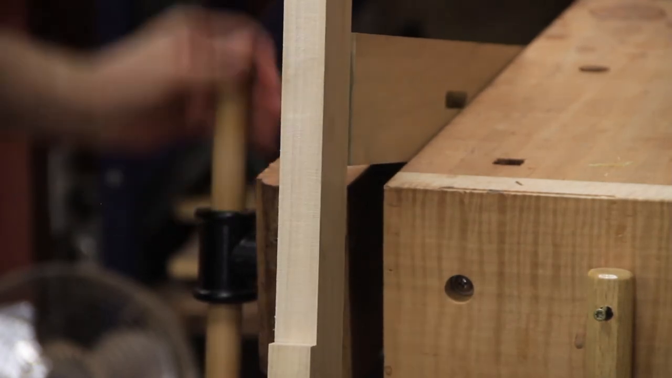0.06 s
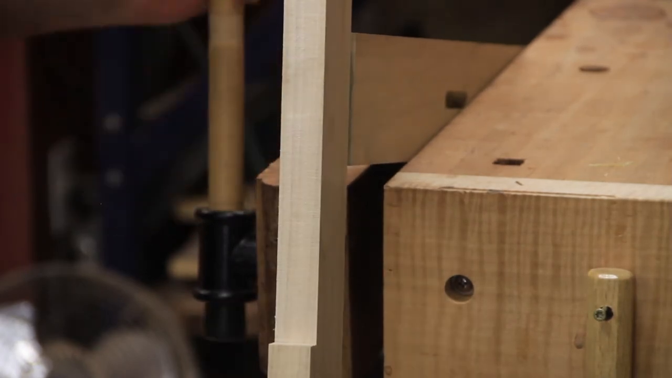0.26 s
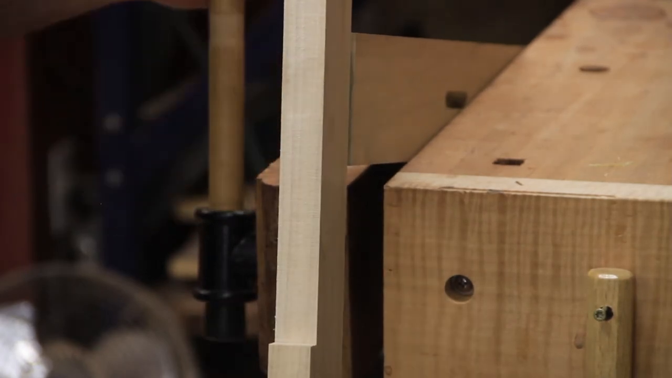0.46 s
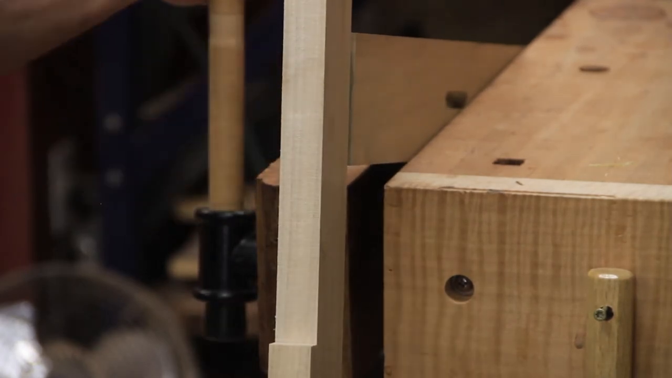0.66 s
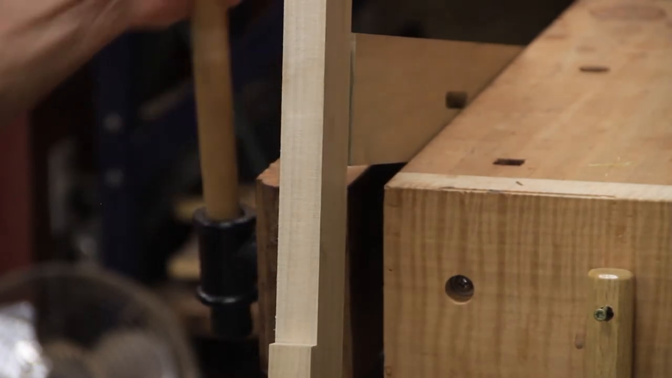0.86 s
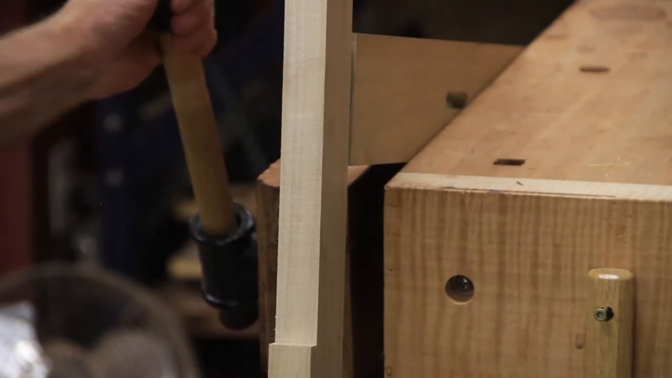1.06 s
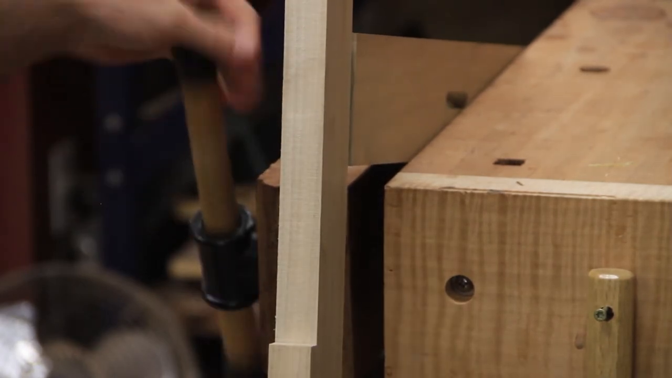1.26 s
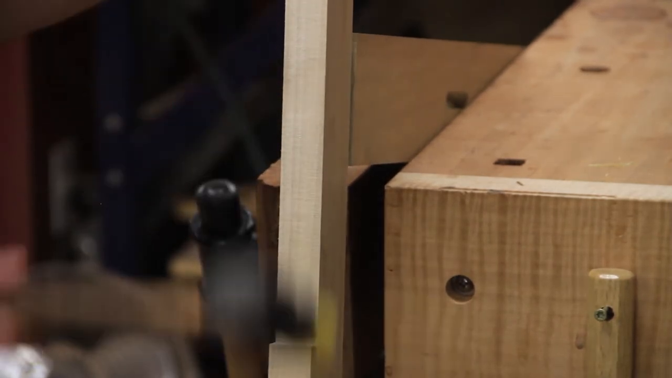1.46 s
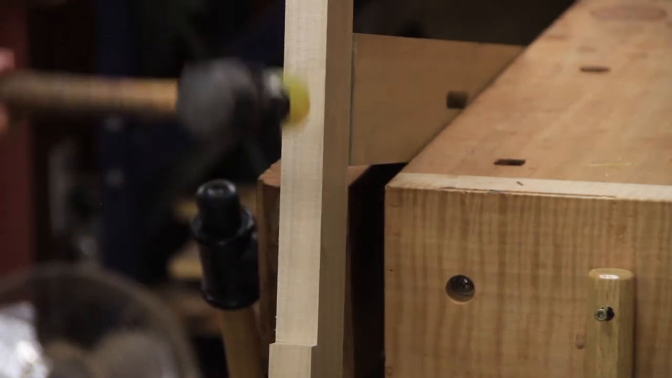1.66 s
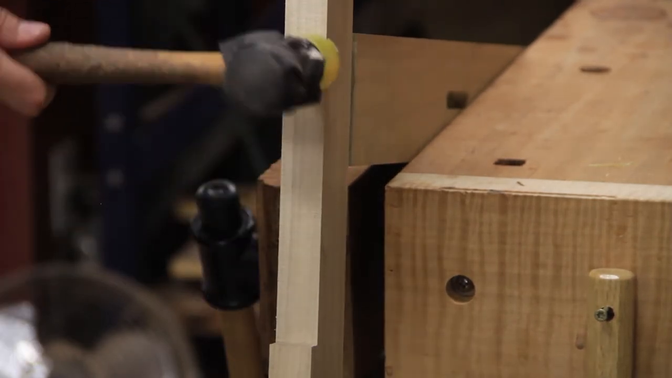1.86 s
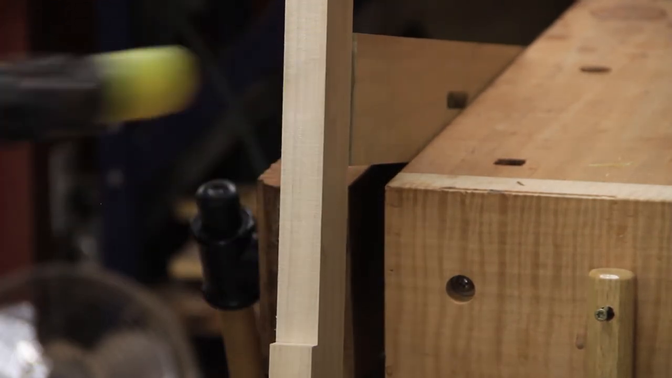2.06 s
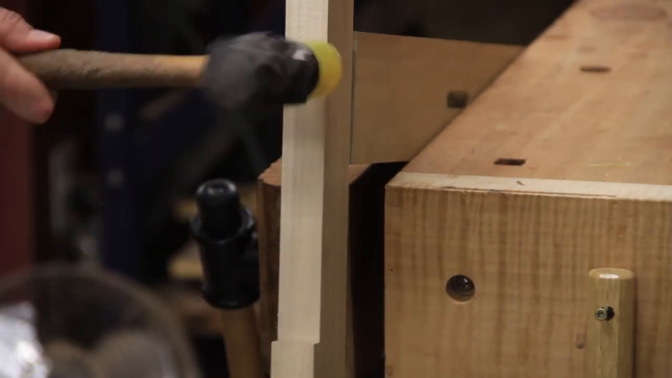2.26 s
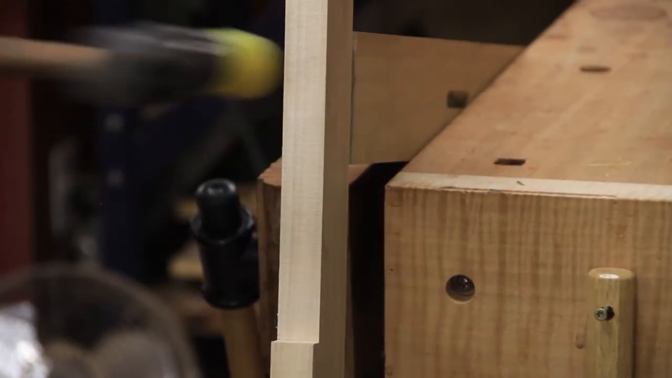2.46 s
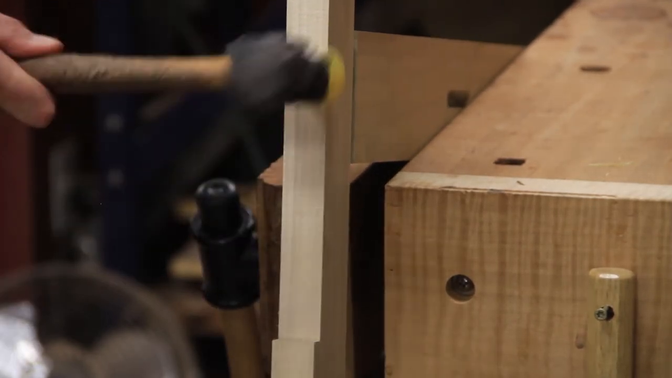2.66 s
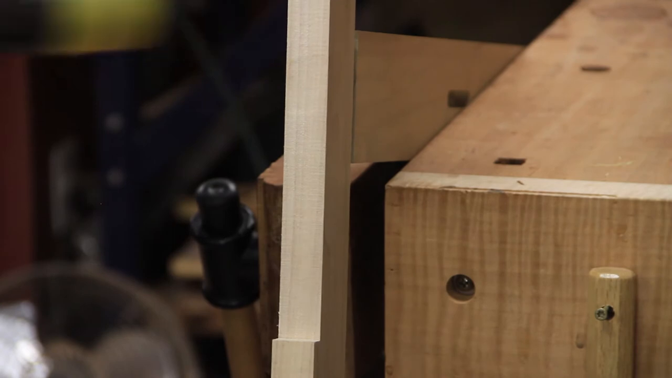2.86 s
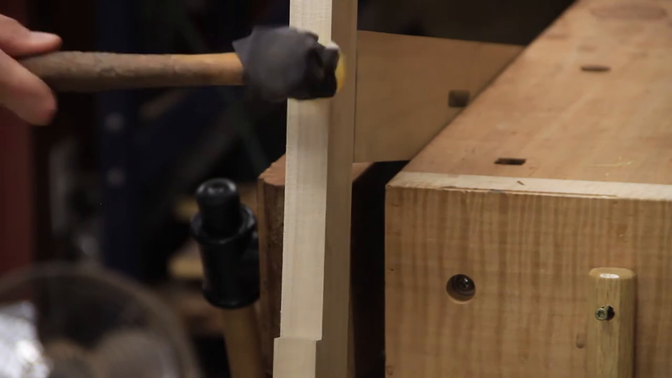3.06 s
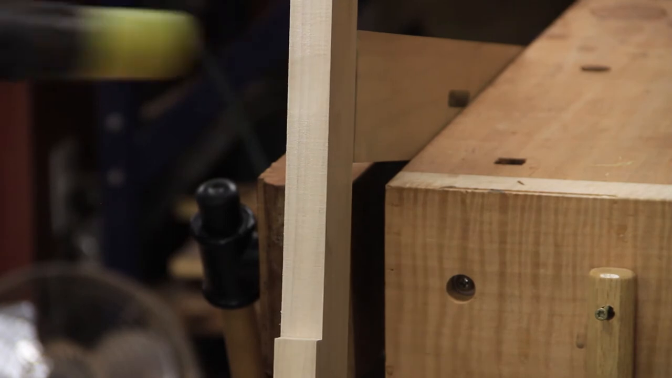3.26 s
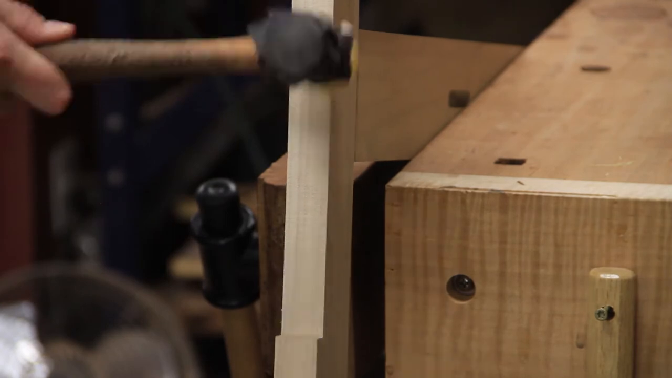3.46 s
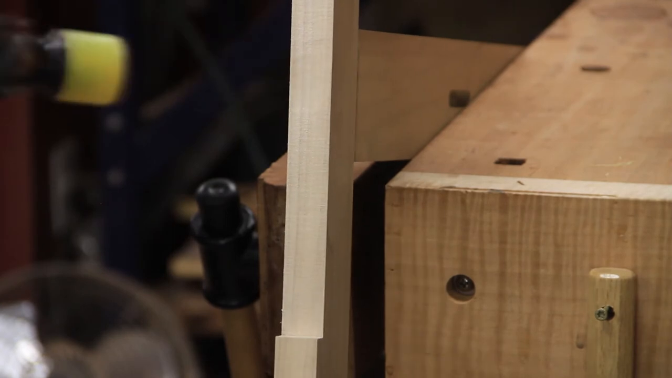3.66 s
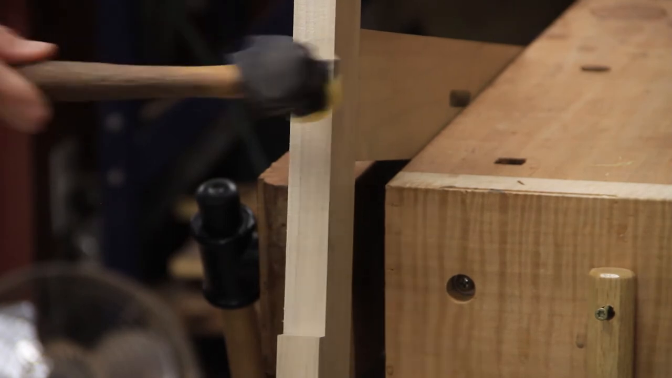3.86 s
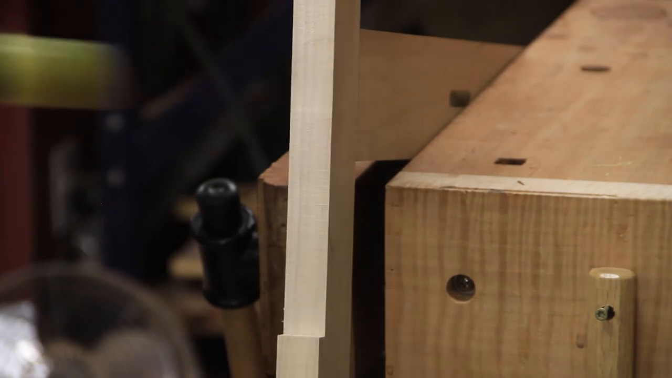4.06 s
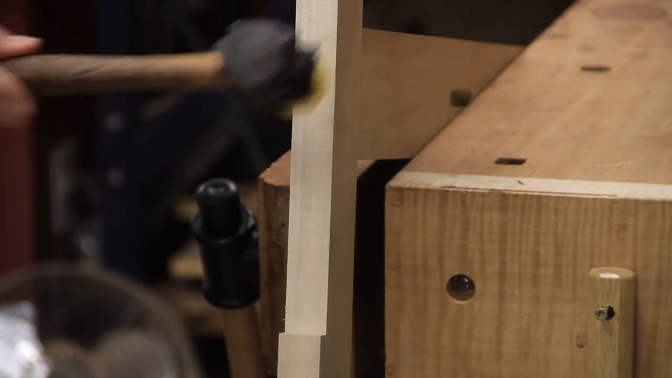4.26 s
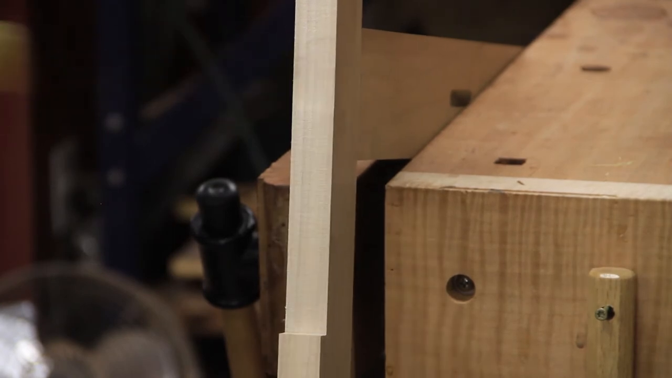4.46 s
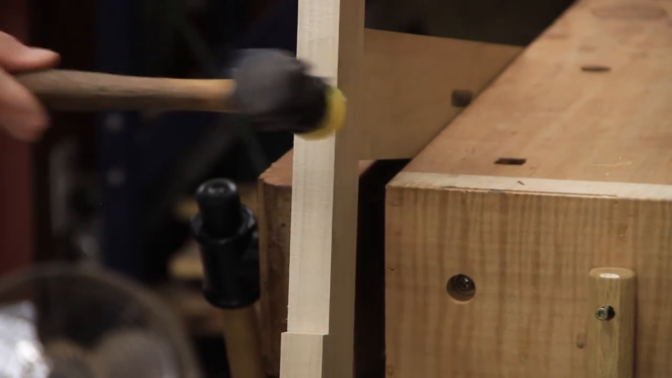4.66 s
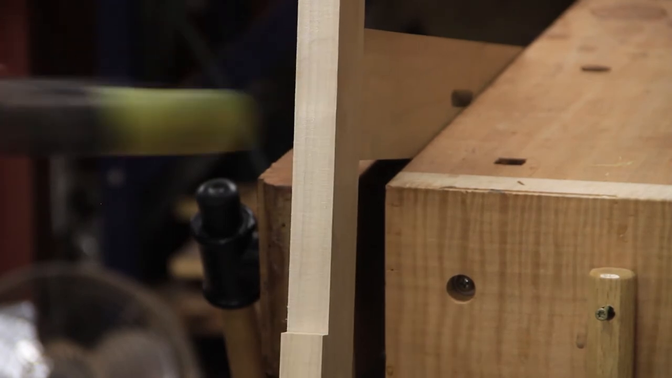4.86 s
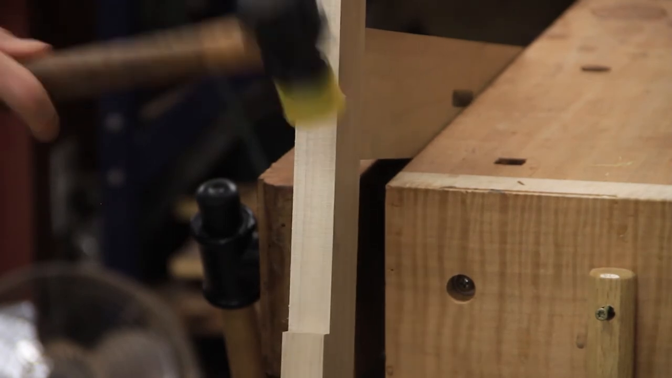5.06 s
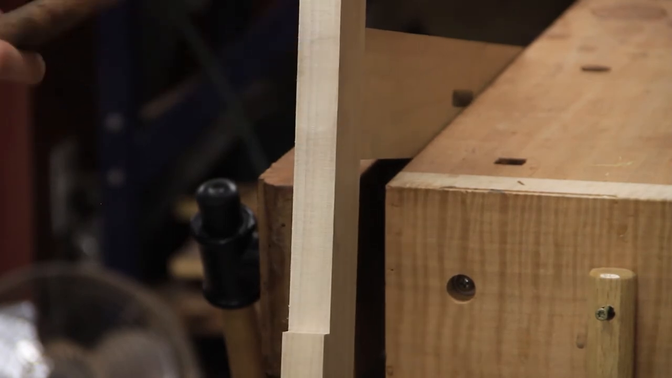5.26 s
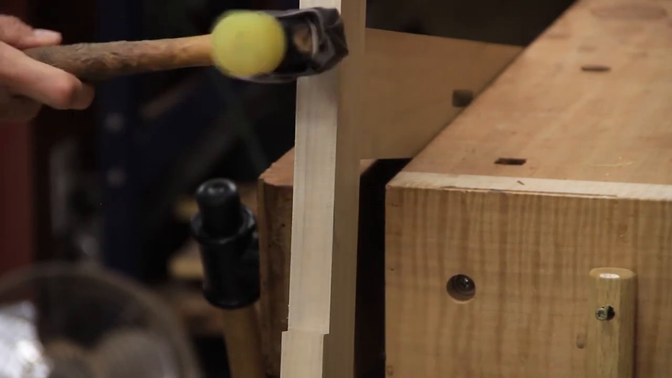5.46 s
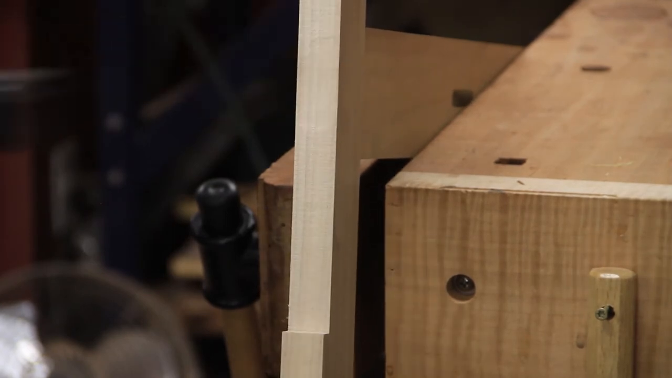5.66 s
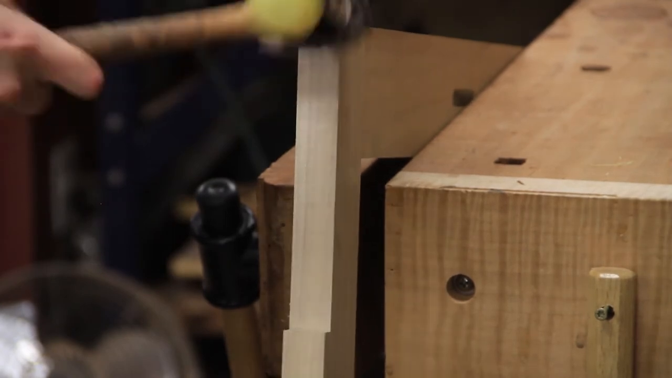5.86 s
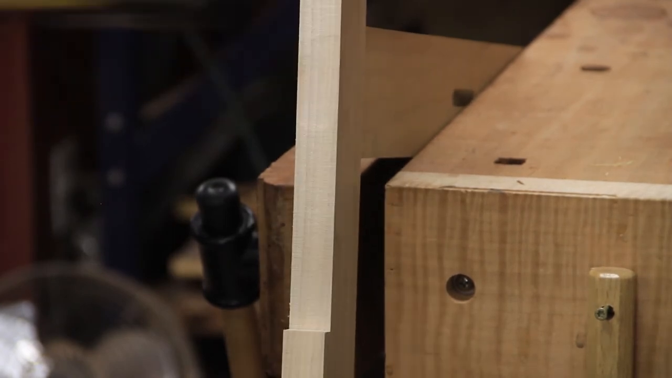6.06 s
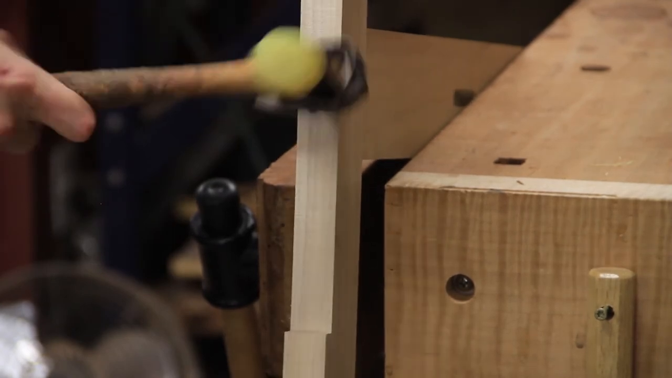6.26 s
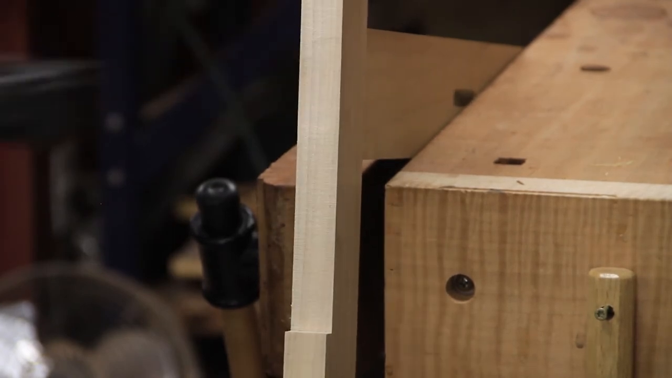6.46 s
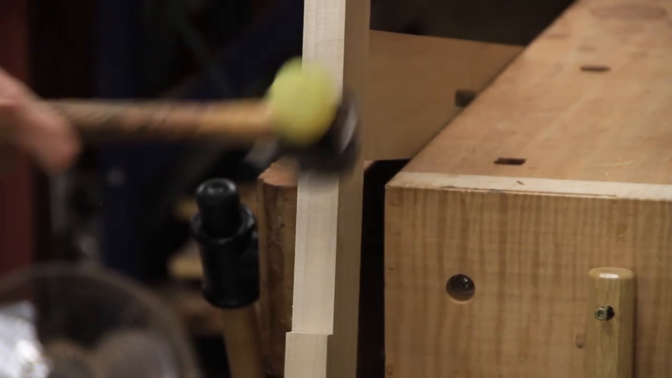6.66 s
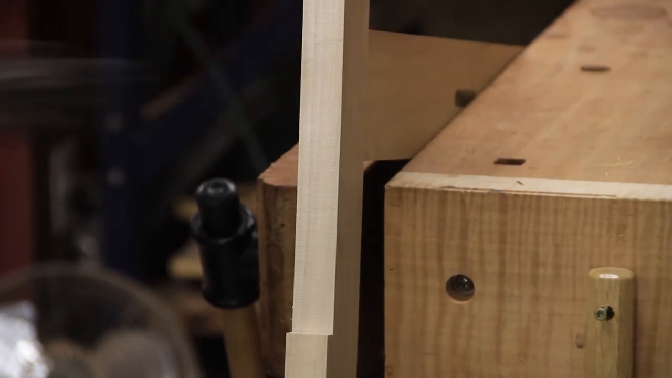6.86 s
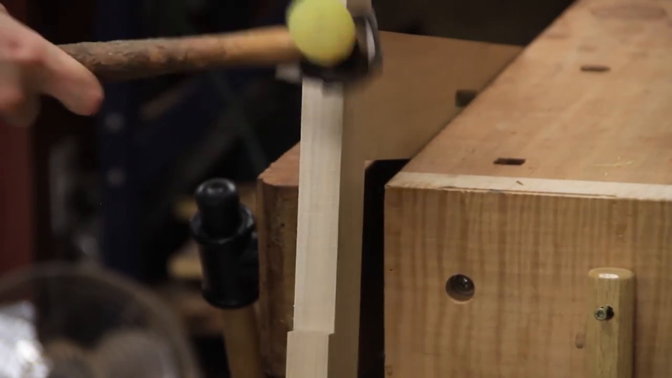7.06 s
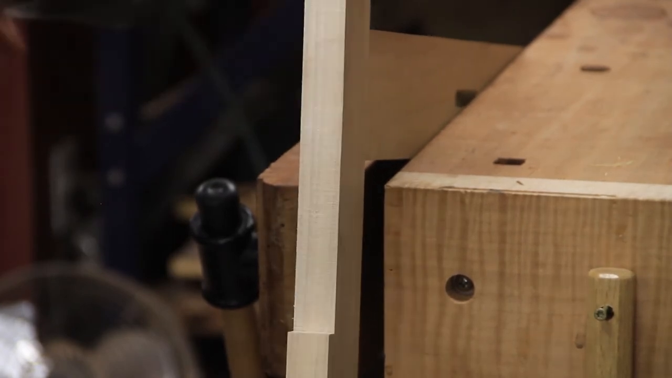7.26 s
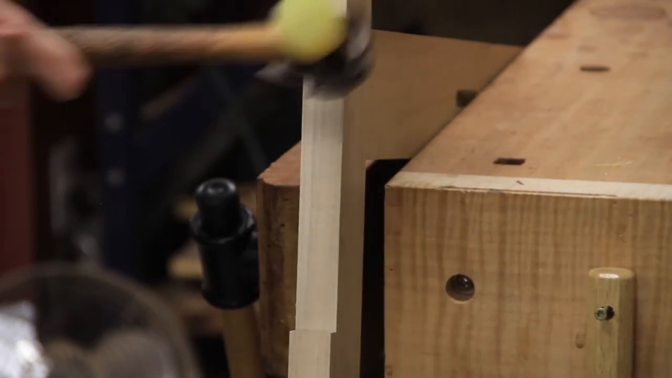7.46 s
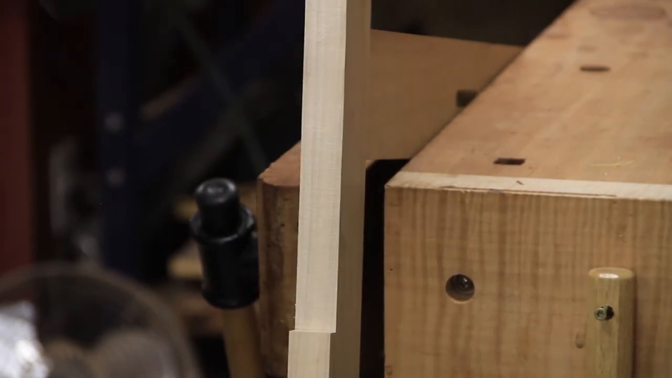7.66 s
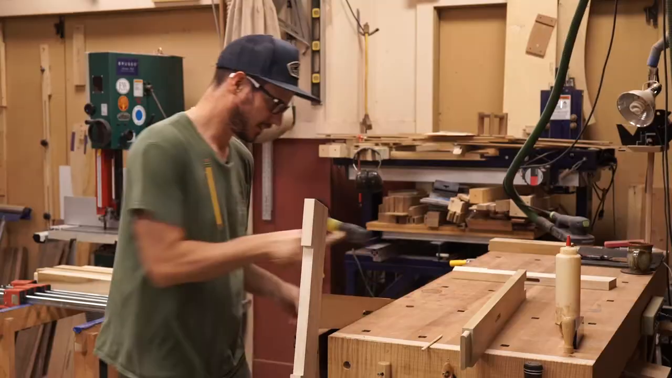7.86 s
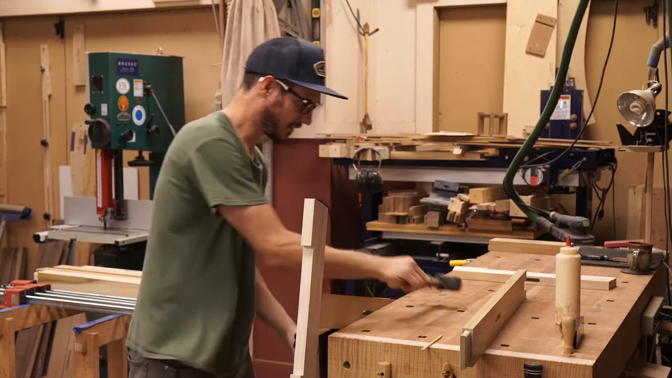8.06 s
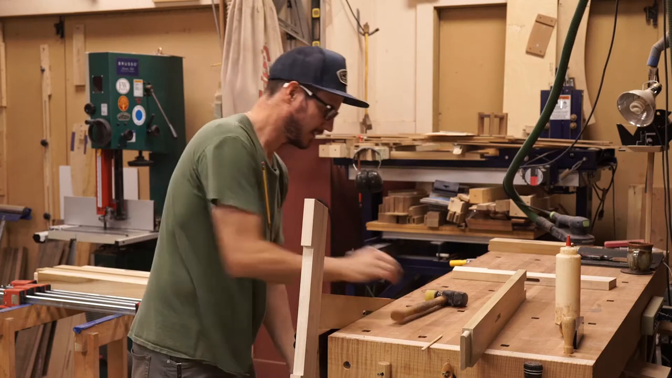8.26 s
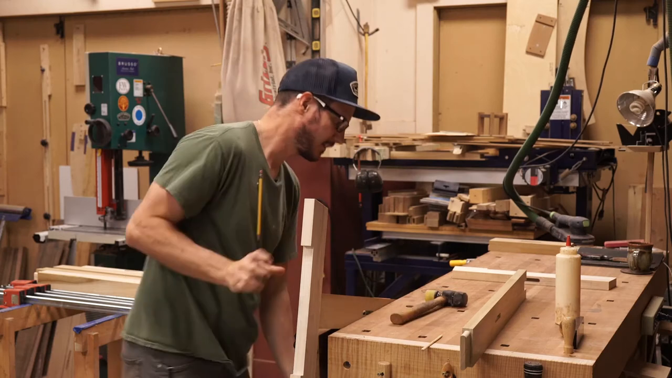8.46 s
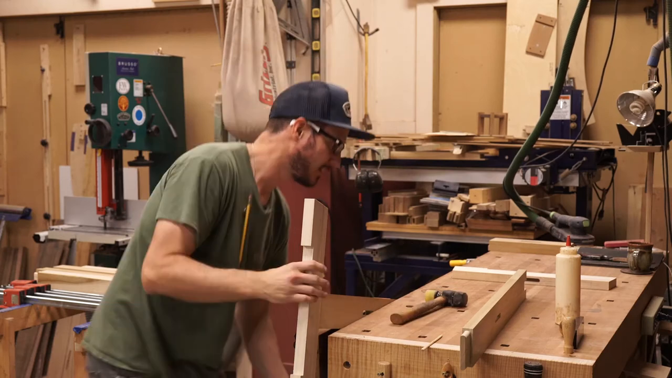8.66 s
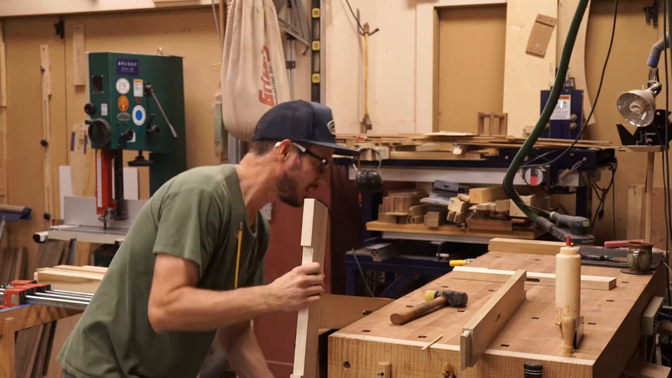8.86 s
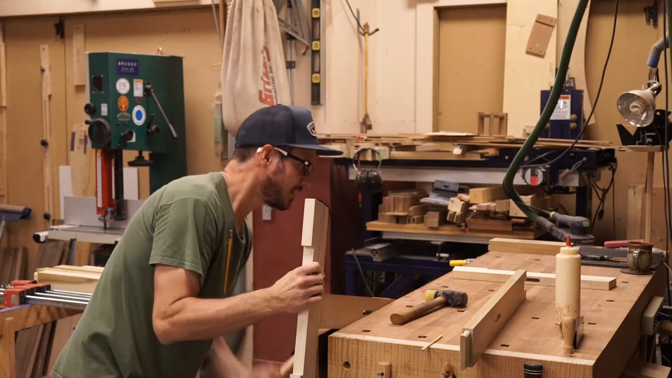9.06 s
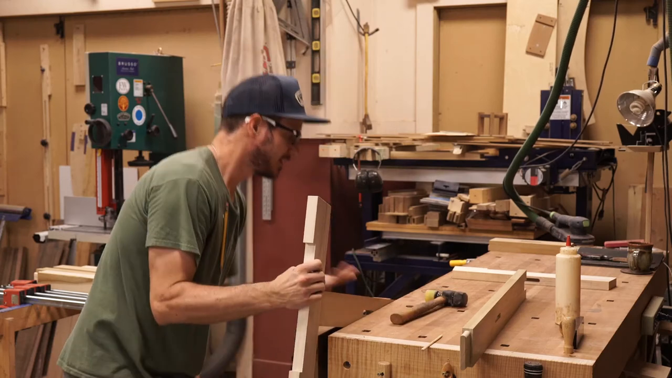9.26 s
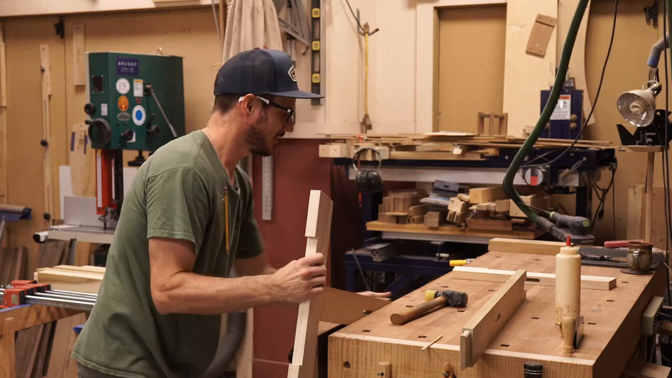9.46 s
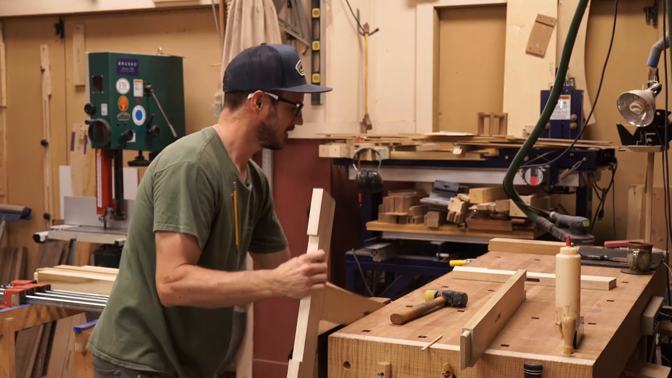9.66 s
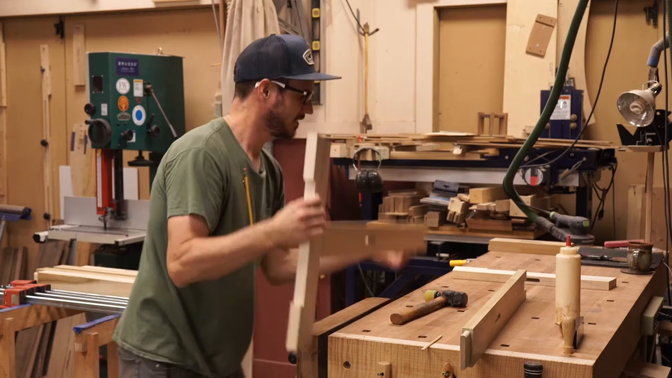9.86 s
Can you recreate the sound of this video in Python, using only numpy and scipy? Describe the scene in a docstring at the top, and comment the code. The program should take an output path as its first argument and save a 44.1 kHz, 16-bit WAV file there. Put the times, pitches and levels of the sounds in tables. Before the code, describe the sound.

In a woodworking shop, light knocks, rubs and a short judder lead to eight hard, bright mallet cracks on a wooden joint at a steady pace. After a brief gap come five duller, softer-faced blows. The mallet drops on the bench, its handle chattering, then hands brush and grip the wood. Close microphone, overloaded by blows, with the room swelling up after each.

```python
"""Woodworking shop: a two-faced mallet drives a glued joint home, eight blows with the hard face, five with the soft.
First, tools knock and rub beside the vise; afterwards the mallet is laid on the bench, its handle bounces,
hands grip the work. Impacts and friction are noise shaped by the resonances of the wood; squeaks, thump and
sway are sines. The blows overload one close microphone: its limiter ducks, then lets the room swell back."""
import sys
import numpy as np
from scipy import signal
from scipy.fft import irfft
from scipy.io import wavfile
from scipy.ndimage import uniform_filter1d

SR = 44100
rng = np.random.default_rng(int(sys.argv[2]) if len(sys.argv) > 2 else 0)


def int16_out(signal):
    """Quantize to a 16-bit WAV file."""
    q = np.round(np.clip(np.atleast_2d(signal).T, -1, 1) * 32767)
    wavfile.write(sys.argv[1], SR, q.astype(np.int16))


N = 436590
FILTER_TAPS = 8192
HZ = np.fft.rfftfreq(FILTER_TAPS, 1 / SR)

# Mallet blows: t/s, force/dB, face hardness (about 0 soft, about 1 hard), bass/dB, favoured ring f/Hz,
# ring lift/dB, bench thump level/dB, board rebound level/dB
BLOWS = [(2.2124, 2.5, 1.27, -1.5, 2310, 10.5, -24, -11), (2.5880, 1.5, 1.03, -0.5, 2150, 5, -19, -13.5),
         (2.9669, 1.5, 1.14, -2.5, 1200, 0, -14.5, -10.5), (3.3476, 0, 1.09, 1, 2060, 2.5, -29, -15),
         (3.7292, 1.5, 0.6, 0.5, 1160, -2, -27, -13), (4.1265, 0.5, 1.22, -1, 3490, 6.5, -19, -9),
         (4.5194, -1, 1.16, -2.5, 3590, 10.5, -20, -9), (4.9075, -4.5, 0.94, 0.5, 625, 7, -28, -3.5),
         (5.7938, -3, 0.21, -1.5, 2250, 9.5, -29, -11.5), (6.1690, -3, -0.07, -1.5, 3530, 2.5, -23, -11),
         (6.542, -2, 0.12, -6, 1980, 2, -21, -18), (6.9192, -2.5, -0.2, -3.5, 1560, 2.5, -22, -12),
         (7.3068, -3.5, -0.25, -2, 960, 2, -25, -13)]
# Joint spectrum under each face: f/Hz, relative level/dB per Hz
HARD_FACE_SPECTRUM = [(35, -50.5), (60, -13), (172, -14.5), (268, -5), (346, -8.5), (389, -3.5), (458, -7),
                      (1140, -4.5), (1580, -10), (2410, -12.5), (2710, -18), (3500, -13), (5090, -18.5),
                      (10000, -20), (16000, -27.5)]
SOFT_FACE_SPECTRUM = [(35, -38), (60, -16.5), (222, -9.5), (274, -7), (346, -8.5), (408, -2.5), (458, -5),
                      (553, -6.5), (1090, -7), (1200, -7), (2710, -19), (3500, -16.5), (5590, -27),
                      (13000, -32), (16000, -44.5)]
# Resonances of joint and bench: f/Hz, width/Hz, lift/dB
JOINT_MODES = [(197, 18, 4.5), (272.5, 17, 5.5), (397.2, 46, 7), (560.4, 69, 8.5), (748, 56, 1.5),
               (1023, 35, 2.5), (1196, 160, 3), (1271, 48, 1.5), (1570, 28, 1), (1990, 140, 3.5),
               (2420, 130, 8.5), (2435, 37, -5), (3050, 130, 4), (3500, 330, 4), (4140, 180, 2.5),
               (4576, 1300, 5), (6900, 300, 0)]
# Direct sound colour: f/Hz, gain/dB
NEAR_COLOUR = [(100, 0), (350, -3.5), (1100, 0.5), (3000, -1.5), (7000, -4), (15000, 2.5)]
ROOM_LIKENESS = .65  # power share of the echoes common to all blows
# Board springs back against the vise: delay, dull peak
REBOUND_S, REBOUND_HZ, REBOUND_WIDTH_HZ = .04, 312, 200

# Light wood taps: t/s, level/dB, brightness/dB per octave, bass/dB, favoured ring f/Hz
KNOCKS = [(.024, -24.5, -2.5, -8, 905), (.141, -25, -16, 1, 670), (.187, -21, -8, -3, 713),
          (0.791, -37, 0, 1, 355), (1.212, -30, -3.5, 3, 970), (1.282, -23.5, -3.5, -3, 885),
          (1.3231, -15.5, -7, -25, 910), (1.3462, -8.5, 4.5, 6, 720), (1.358, -13, -2, -1.5, 96),
          (1.7830, -3.5, 1, -2.5, 522), (1.859, -17.5, 0, -2, 370), (5.4391, -12.5, 0, 4.5, 371),
          (7.632, -35, -17, 37, 59), (8.2064, -10, 1, -2.5, 847), (8.277, -21, -3.5, 2, 200),
          (8.779, -37, -9, 0, 106.5), (9.036, -32.5, 2, 10, 634), (9.091, -33, 3.5, 10, 455),
          (9.137, -28, -5, 8, 186), (9.247, -26, 0, 12, 900), (9.6477, -26, -1, 3, 550),
          (9.7511, -19, 1, -4, 413), (9.8020, -18, 2.5, -13, 1230)]
# Wood under a knock: f/Hz, relative level/dB per Hz
WOOD_SPECTRUM = [(40, -17.5), (100, -5.5), (200, -6.5), (380, -6.5), (750, -7.5), (1200, -12),
                 (2500, -20.5), (4500, -30.5), (7000, -43), (16000, -46)]
# Bench resonances: f/Hz, width/Hz, lift/dB
BENCH_MODES = [(272, 34, 6.5), (419, 81, 6), (658, 48, 6.5), (950, 52, 6.5), (1150, 32, -1.5),
               (1716, 74, 8.5), (2340, 100, 8), (3240, 130, 8)]
KNOCK_RING_DB, KNOCK_RING_WIDTH_SHARE = 15, .27  # width as a share of the ring's pitch
# Weaker second contact: delay, level re first, treble tilt per octave, ring
SETTLE_S, SETTLE_DB, SETTLE_DB_PER_OCTAVE, SETTLE_HZ = .016, -11.5, -4.5, 393

# Mallet handle: f/Hz, relative level/dB per Hz
HANDLE_SPECTRUM = [(60, -11), (200, 1), (450, 4), (1000, -0.5), (1600, -4.5), (2800, -7.5), (4400, -2),
                   (6000, -25), (10000, -24), (16000, -36)]
# Handle resonances: f/Hz, width/Hz, lift/dB
HANDLE_MODES = [(1110, 41, 7.5), (1325, 130, 13), (1620, 55, 3), (1920, 280, 14.5), (2150, 92, 5),
                (2700, 360, 14.5), (4420, 240, 12.5), (6440, 350, 16), (8600, 190, 7)]
DROP_S, DROP_DB, BOUNCE_LOSS_DB = 8.3261, -8.5, 7
FIRST_FLIGHT_S, FLIGHT_RATIO = .0906, .637

# Tool scuffs, then judders into place: mid-stroke t/s, length/s, level/dB
SCRAPES = [(1.215, 0.068, -27), (1.328, 0.05, -18.5), (1.362, .06, -11.5)]
# Scrape spectrum: f/Hz, relative level/dB per Hz
SCRAPE_SPECTRUM = [(100, -24), (350, 8.5), (550, -8), (800, 5), (1000, 0.5), (1300, -16), (1650, -8),
                   (2400, -36), (5000, -39), (16000, -57)]
# Hands shifting on the work: mid-stroke t/s, length/s, relative level/dB
GRIPS = [(9.14, 0.52, -43), (9.254, 0.11, -28.5), (9.59, 0.18, -46), (9.775, 0.15, -33),
         (9.835, 0.042, -29)]
# Grip spectrum: f/Hz, relative level/dB per Hz
GRIP_SPECTRUM = [(35, -51), (60, -13), (371, -4), (480, 0), (527, 2.5), (1170, -3.5), (1340, -5),
                 (2140, -11.5), (2350, -14.5), (5330, -32), (16000, -33)]
# Tool or hand sliding on wood: mid-stroke t/s, length/s, relative level/dB
RUBS = [(.09, 0.42, -33), (.80, 0.72, -52.5), (1.27, 0.41, -43.5), (1.72, 0.16, -45), (7.82, 0.17, -51),
        (8.69, 0.086, -51)]
# Rub spectrum: f/Hz, relative level/dB per Hz
RUB_SPECTRUM = [(35, -52), (60, -28), (91, 1), (149, -21), (189, -5), (371, -7.5), (553, -11.5), (682, 1),
                (1340, -21.5), (2350, -31), (6140, -38), (14200, -52), (16000, -68)]
# Sleeves and skin brushing: mid-stroke t/s, length/s, relative level/dB
BRUSHES = [(.203, 0.073, -45.5), (.365, 0.2, -52), (.94, 0.32, -51.5), (1.14, 0.18, -52),
           (1.555, 0.15, -49.5), (1.738, 0.18, -37.5), (1.935, 0.25, -44), (2.11, 0.11, -44.5),
           (7.795, 0.17, -49.5), (8.686, .065, -46.5), (8.885, .24, -57.5), (9.21, 0.14, -42.5),
           (9.28, 0.042, -43), (9.332, .04, -50), (9.575, 0.23, -49), (9.745, 0.096, -37.5),
           (9.79, 0.064, -34.5), (9.84, .04, -42)]
# Brush spectrum: f/Hz, relative level/dB per Hz
BRUSH_SPECTRUM = [(500, -42), (1500, 13), (3500, 13), (6500, 4.5), (10000, 8.5), (13000, 9), (16000, 5)]

# Thin squeaks of a movement: middle t/s, length/s, top pitch f/Hz, relative level/dB
SQUEAKS = [(.76, .16, 15200, -53), (1.925, .27, 15400, -48), (9.143, .08, 14400, -43)]
# Squeak partials: share of the pitch, relative level/dB
SQUEAK_PARTIALS = [(1, -4), (.84, -9), (1, 3)]
# Pitch drop at both ends and random rms waver, as shares of the pitch
SQUEAK_SAG_SHARE, SQUEAK_WAVER_SHARE = .25, .035
SQUEAK_WAVER_S, SQUEAK_FLUTTER_S = .025, .002
# Dry ticks close by: t/s, level/dB, f/Hz, width/Hz
TICKS = [(.639, -43, 14000, 5000), (1.943, -34, 11000, 4000), (8.043, -41, 12800, 3980),
         (9.4153, -31, 1044, 340)]

# Air of the shop: f/Hz, relative level/dB per Hz
AIR_SPECTRUM = [(12, -36), (20, -13), (93, 1), (210, -2), (377, -5.5), (624, -4), (759, -10), (897, -8.5),
                (2080, -19), (3160, -21.5), (4180, -27), (13500, -30), (16000, -38)]
AIR_DB = -52
# Reverberation: f/Hz, t60/s
SHOP_T60 = [(80, 0.39), (210, 0.42), (560, 0.53), (1470, 0.63), (3880, 0.56), (8000, 0.48), (15000, 0.35)]
# Reverberation colour: f/Hz, level/dB
SHOP_COLOUR = [(40, -3), (90, 3), (160, 0), (290, 2), (500, 0.5), (1200, 0), (4000, -3), (14000, 3.5)]
# Time for the room to fill: f/Hz, time constant/s
SHOP_BUILD_UP = [(100, 0.0073), (400, 0.0041), (1200, 0.004), (4000, 0.017), (14000, 0.0043)]
LIMIT_DB, SENSE_S, EDGE_HZ = -10.5, .006, 16000


def blows(thump_hz=46, thump_t60_s=0.11, sway_hz=72, sway_re_thump_db=-11, sway_t60_s=0.57):
    """Face sets the treble, struck spot favours one ring, board rebounds, heavy bench thumps and sways."""
    out, t, same_room = np.zeros(N), np.arange(SR) / SR, shop()
    thump = amp(-60 * t / thump_t60_s) * np.sin(2 * np.pi * thump_hz * t)
    sway = amp(sway_re_thump_db - 60 * t / sway_t60_s) * np.sin(2 * np.pi * sway_hz * t)
    for s, force_db, hard, bass_db, ring_hz, ring_db, thump_db, rebound_db in BLOWS:
        colour_db = hard * read(HARD_FACE_SPECTRUM) + (1 - hard) * read(SOFT_FACE_SPECTRUM)
        colour_db = colour_db + bass_db * shelf(520) + ripple()
        colour_db = colour_db + lifts(JOINT_MODES) + lifts([(ring_hz, 150, ring_db)])
        crack = amp(3.0) * body(shock(contact_s=0.003), colour_db + read(NEAR_COLOUR))
        # echoes mostly repeat from blow to blow
        room = np.sqrt(ROOM_LIKENESS) * same_room + np.sqrt(1 - ROOM_LIKENESS) * shop()
        tail = amp(-2.5) * body(room, colour_db)
        add(out, s, amp(force_db) * (crack + tail))
        add(out, s, amp(thump_db) * (thump + sway))
        rebound_colour_db = colour_db + hump(REBOUND_HZ, REBOUND_WIDTH_HZ)
        thud = body(impact(contact_s=0.0072, room_db=-17.5), rebound_colour_db)
        add(out, s + REBOUND_S, amp(rebound_db) * thud)
    return out


def ripple():
    """Each blow lands a little elsewhere and weights the many upper modes of the wood anew (dB)."""
    smoothed = uniform_filter1d(rng.standard_normal(len(HZ)), size=18)
    weights = evened(uniform_filter1d(smoothed, size=12))
    return 1.4 * weights * (1 - shelf(700))


def knocks():
    """Gentle contacts, dull, short and woody; each settles with a softer second touch."""
    out, octaves = np.zeros(N), np.log2(np.clip(HZ, 500, 6000) / 500)
    for s, db, db_per_octave, bass_db, ring_hz in KNOCKS:
        colour_db = read(WOOD_SPECTRUM) + db_per_octave * octaves + bass_db * shelf(280) + lifts(BENCH_MODES)
        touch = body(impact(contact_s=0.0026, room_db=-13.5), colour_db + favoured(ring_hz))
        add(out, s, amp(db) * touch)
        settle_colour_db = colour_db + SETTLE_DB_PER_OCTAVE * octaves + favoured(SETTLE_HZ)
        settle = body(impact(contact_s=0.009, room_db=-13), settle_colour_db)
        add(out, s + SETTLE_S, amp(db + SETTLE_DB) * settle)
    return out


def favoured(hz):
    """Ring that one contact brings out (dB)."""
    return lifts([(hz, KNOCK_RING_WIDTH_SHARE * hz, KNOCK_RING_DB)])


def handle(count=5):
    """Handle drops and chatters: each flight is a fixed share of the one before, each hit weaker."""
    out, s = np.zeros(N), DROP_S
    for k in range(count):
        hit = body(impact(contact_s=0.0018, room_db=-16), read(HANDLE_SPECTRUM) + lifts(HANDLE_MODES))
        add(out, s, amp(DROP_DB - k * BOUNCE_LOSS_DB) * hit)
        s += FIRST_FLIGHT_S * FLIGHT_RATIO ** k
    return out


def scraping():
    """Coarse, dense judder of the tool against wood, with little smooth hiss."""
    return friction(SCRAPES, read(SCRAPE_SPECTRUM), slips_per_s=520, smooth=0.54, room_db=-5)


def gripping():
    """Slips of hands taking hold, coloured low."""
    return amp(-0.5) * friction(GRIPS, read(GRIP_SPECTRUM), slips_per_s=350, smooth=0.8, room_db=-9)


def rubbing():
    """Sliding friction excites the bench resonances."""
    colour_db = read(RUB_SPECTRUM) + lifts(BENCH_MODES) + lifts([(1620, 280, 2.1)])
    return amp(2) * friction(RUBS, colour_db, slips_per_s=300, smooth=1.0, room_db=-8)


def brushing():
    """Soft friction of sleeves and skin: more hiss than slips, bright."""
    return amp(-3.5) * friction(BRUSHES, read(BRUSH_SPECTRUM), slips_per_s=390, smooth=1.5, room_db=-10.5)


def friction(strokes, colour_db, slips_per_s, smooth, room_db):
    """Tiny slips of random size over a smooth hiss follow the speed of each stroke; the room answers."""
    slips = evened(rng.standard_normal(N) * (rng.random(N) < slips_per_s / SR))
    grain = evened(slips + smooth * rng.standard_normal(N))
    level = sum(amp(db) * stroke(s, length_s) for s, length_s, db in strokes)
    direct, room = body(level * grain, colour_db), shop()
    echo = signal.oaconvolve(direct, room / np.linalg.norm(room))[:N]
    return direct + amp(room_db) * echo


def stroke(middle_s, length_s):
    """Speed of one movement: it swells from rest and dies away again."""
    phase = np.clip((np.arange(N) / SR - middle_s) / length_s, -.5, .5)
    return np.cos(np.pi * phase) ** 2


def squeaks():
    """Thin, scratchy partials; pitch and level follow the speed of the movement, waver and flutter by chance."""
    out = np.zeros(N)
    for s, length_s, top_hz, db in SQUEAKS:
        speed = np.sin(np.pi * np.arange(0, length_s, 1 / SR) / length_s)
        for share, partial_db in SQUEAK_PARTIALS:
            waver = SQUEAK_WAVER_SHARE * wander(len(speed), SQUEAK_WAVER_S)
            hz = share * top_hz * (1 - SQUEAK_SAG_SHARE * (1 - speed) + waver)
            level = amp(db + partial_db) * speed ** 2 * wander(len(speed), SQUEAK_FLUTTER_S)
            add(out, s - length_s / 2, level * np.sin(2 * np.pi * np.cumsum(hz) / SR))
    return out


def wander(length, time_s):
    """Random drift of unit rms that changes over about time_s."""
    return evened(uniform_filter1d(rng.standard_normal(SR), size=max(round(time_s * SR), 1)))[:length]


def ticks(contact_s=0.00072):
    """Tiny contacts too weak to stir the room."""
    out = np.zeros(N)
    for s, db, hz, width_hz in TICKS:
        add(out, s, amp(db) * body(shock(contact_s), hump(hz, width_hz)))
    return out


def air():
    """Still air of the shop: steady, filtered noise."""
    return amp(AIR_DB) * body(rng.standard_normal(N), read(AIR_SPECTRUM))


def shop(echo_db=-3, echo_s=0.032):
    """One second of room: reflections gather and melt into a tail, each band dying at its own speed."""
    t = np.arange(SR) / SR
    early = evened(rng.standard_normal(SR) * (rng.random(SR) < 500 / SR))  # about 500 reflections/s
    taps = rng.standard_normal(SR) + amp(echo_db) * np.exp(-t / echo_s) * early
    hz, at_s, bands = signal.stft(taps, SR, nperseg=512)
    bands *= amp(read(SHOP_COLOUR, hz)[:, None] - 60 * at_s / read(SHOP_T60, hz)[:, None])
    bands *= 1 - np.exp(-at_s / read(SHOP_BUILD_UP, hz)[:, None])
    return signal.istft(bands, SR, nperseg=512)[1][:SR] * np.minimum(t / 0.0021, 1)


def impact(contact_s, room_db):
    """The shock, with the room behind it."""
    return shock(contact_s) + amp(room_db) * shop()


def shock(contact_s):
    """Noise burst as the blow crosses the wood: fast rise, peak at contact_s, abrupt end."""
    u = np.arange(SR) / SR / contact_s
    return np.sqrt(u) * np.exp((1 - u ** 2) / 4) * rng.choice([-1., 1.], SR)


def body(x, db):
    """Causal minimum-phase filter of unit energy, whose peaks ring on."""
    log_gain = np.log(amp(np.r_[db, db[-2:0:-1]]))
    response = np.exp(np.conj(signal.hilbert(log_gain)))[:len(HZ)]
    ring = irfft(response)[:FILTER_TAPS // 2]
    return signal.oaconvolve(x, ring / np.linalg.norm(ring))[:len(x)]


def lifts(modes):
    """Resonance peaks (dB)."""
    return sum(db / (1 + (2 * (HZ - hz) / width_hz) ** 2) for hz, width_hz, db in modes)


def hump(hz, width_hz):
    """One broad peak with steep skirts (dB)."""
    return -20 * np.log10(1 + ((HZ - hz) / width_hz) ** 2)


def shelf(corner_hz):
    """Weight 1 in the bass, one half at the corner, toward 0 above."""
    return 1 / (1 + (HZ / corner_hz) ** 4)


def read(points, hz=HZ):
    """Curve joined by straight lines on a log-frequency axis."""
    f, value = np.transpose(points)
    return np.interp(np.log(hz + 1), np.log(f + 1), value)


def amp(db):
    """Amplitude factor from dB."""
    return 10 ** (np.asarray(db) / 20)


def evened(x):
    """Scales x to unit rms."""
    return x / np.sqrt(np.mean(x ** 2) + 1e-20)


def add(mix, s, sound):
    """Adds sound to mix from s seconds on."""
    part = mix[max(round(s * SR), 0):][:len(sound)]
    part += sound[:len(part)]


def scene():
    """Blows and handling noises over the still air of the shop, all heard from one point."""
    impacts = blows() + knocks() + handle() + ticks()
    handling = scraping() + gripping() + rubbing() + brushing() + squeaks()
    return np.tile(impacts + handling + air(), (2, 1))


def record(dry, recovery_db_per_s=118, attack_s=0.00069):
    """Limiter too slow for the first milliseconds, which clip; it recovers as the room dies away."""
    x = dry[0]
    sense, attack = np.exp(-1 / (SENSE_S * SR)), np.exp(-1 / (attack_s * SR))
    power_db = 10 * np.log10(signal.lfilter([1 - sense], [1, -sense], x ** 2) + 1e-12)
    fall_db = np.arange(N) * recovery_db_per_s / SR
    held_db = np.maximum.accumulate(power_db + fall_db) - fall_db  # peaks, falling at the recovery rate
    over_db = np.maximum(held_db - LIMIT_DB, 0)
    ducked = x / amp(signal.lfilter([1 - attack], [1, -attack], over_db))
    clipped = np.clip(ducked, -1, 1)
    lowpass = signal.firwin(511, EDGE_HZ, window=("kaiser", 7), fs=SR)
    return np.tile(signal.oaconvolve(clipped, lowpass, "same"), (2, 1))


dry = scene()
out = record(dry)
int16_out(out)
```